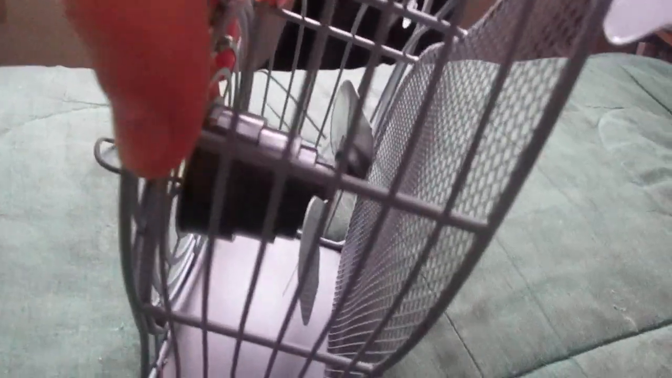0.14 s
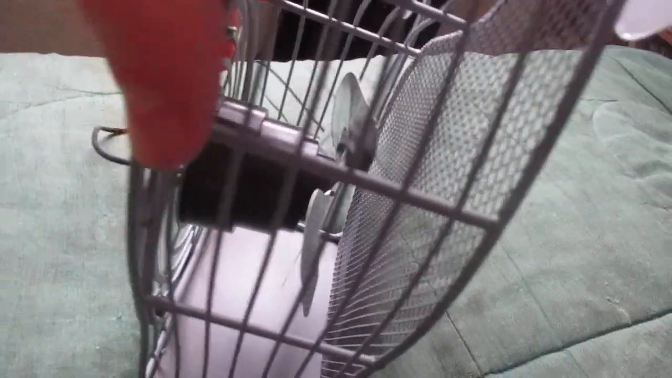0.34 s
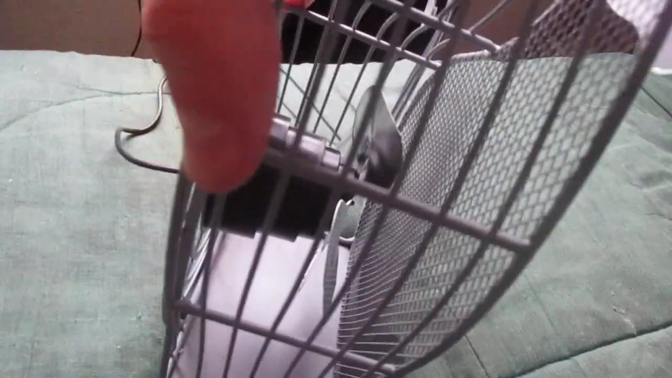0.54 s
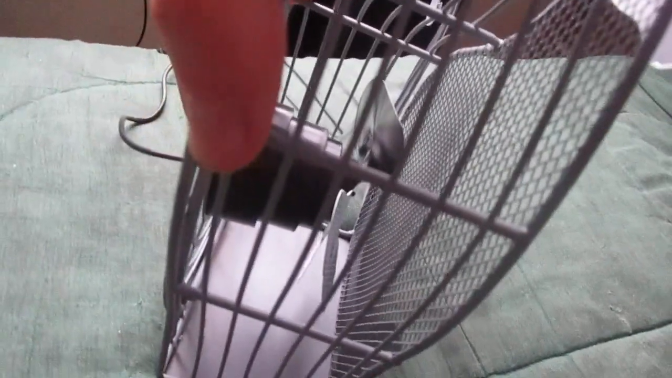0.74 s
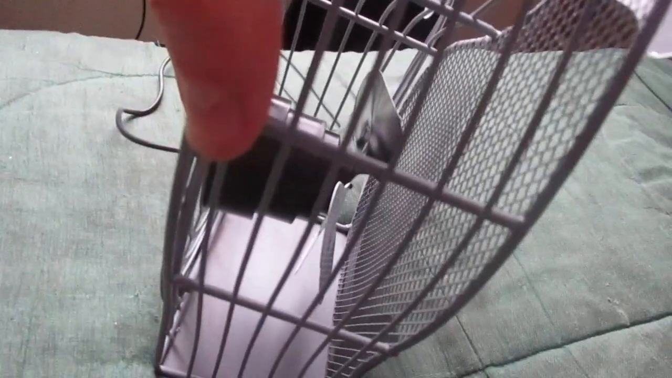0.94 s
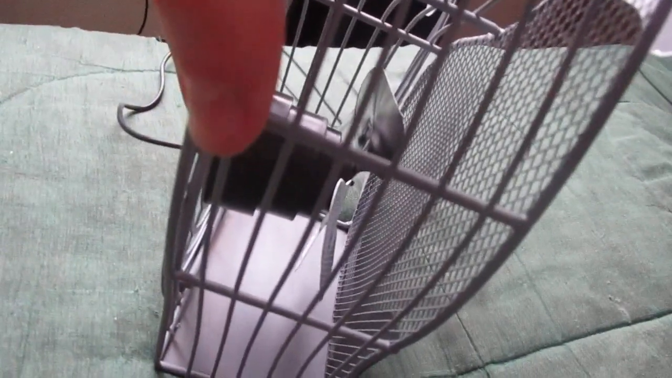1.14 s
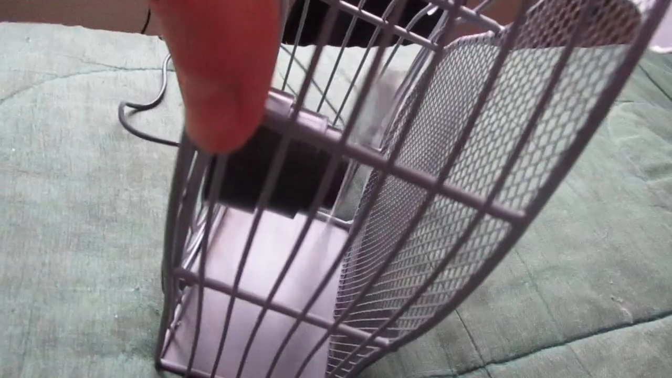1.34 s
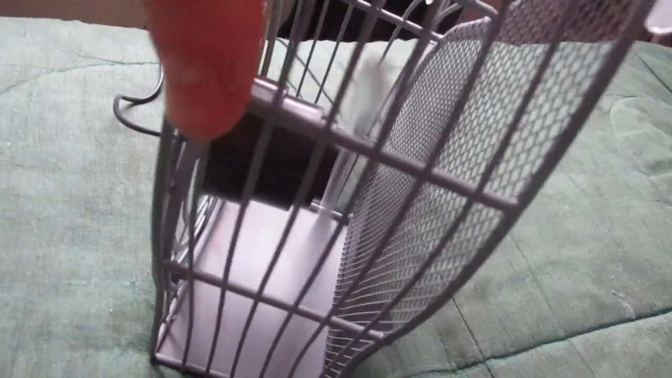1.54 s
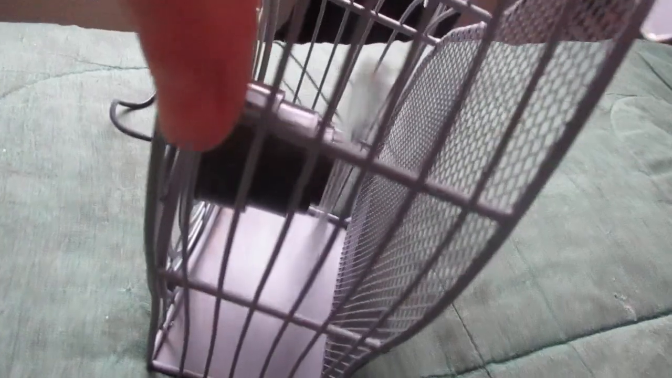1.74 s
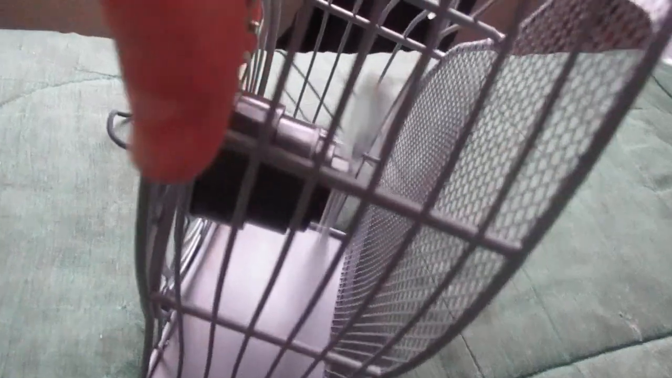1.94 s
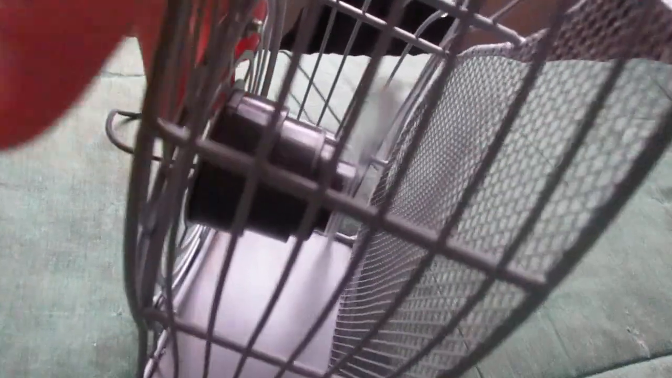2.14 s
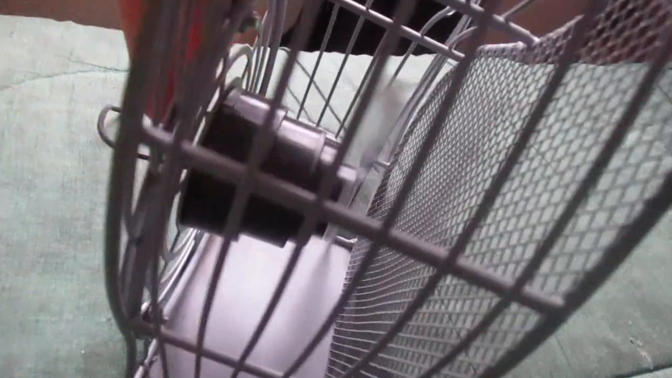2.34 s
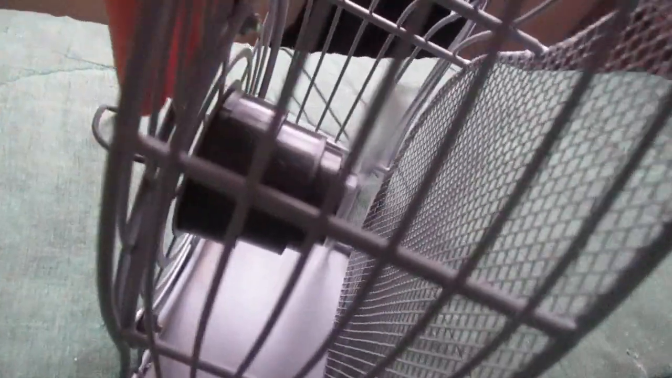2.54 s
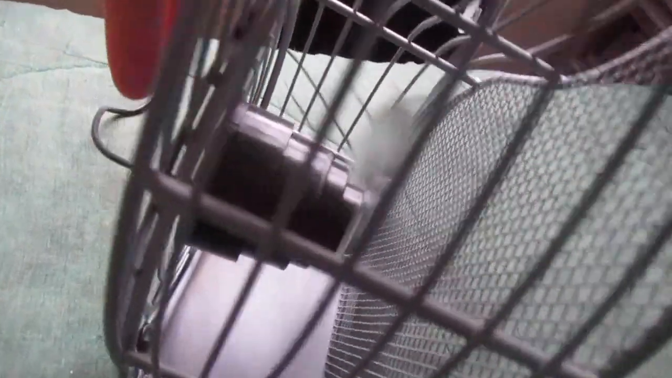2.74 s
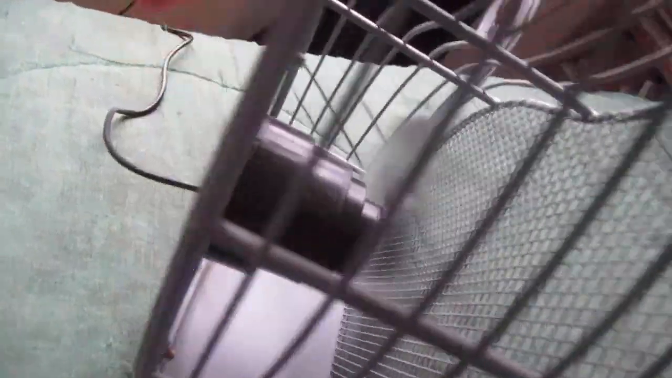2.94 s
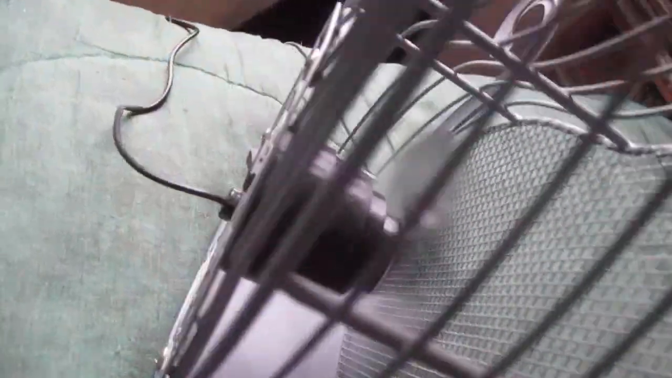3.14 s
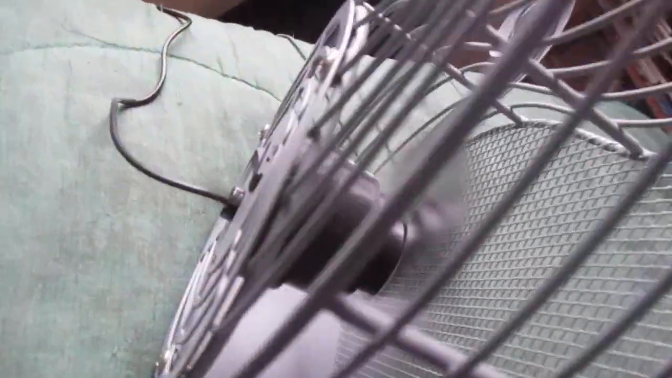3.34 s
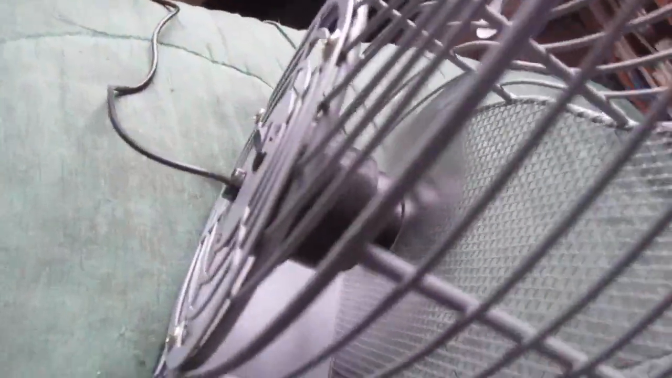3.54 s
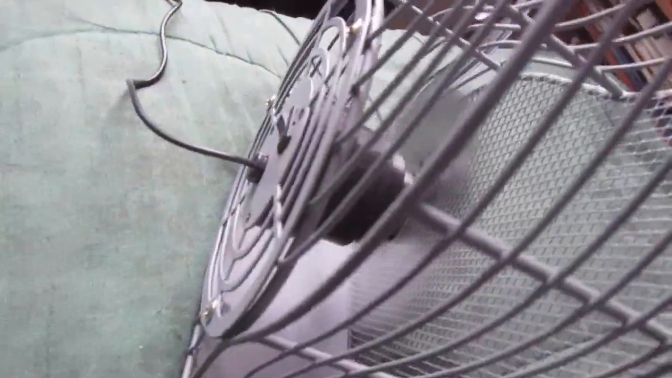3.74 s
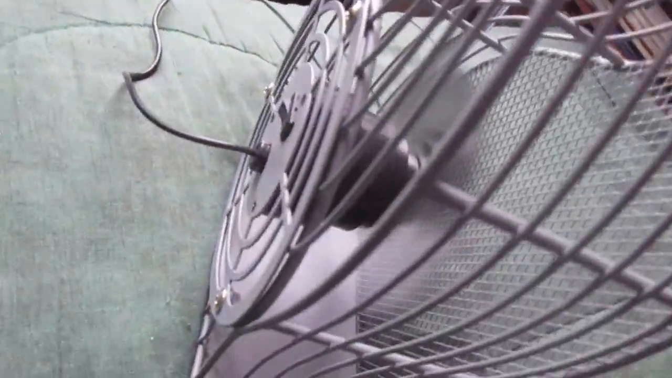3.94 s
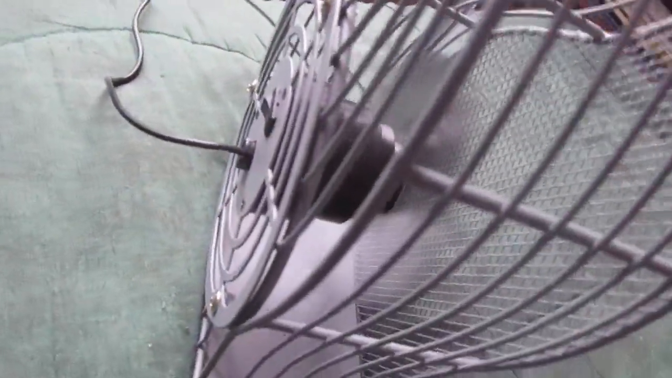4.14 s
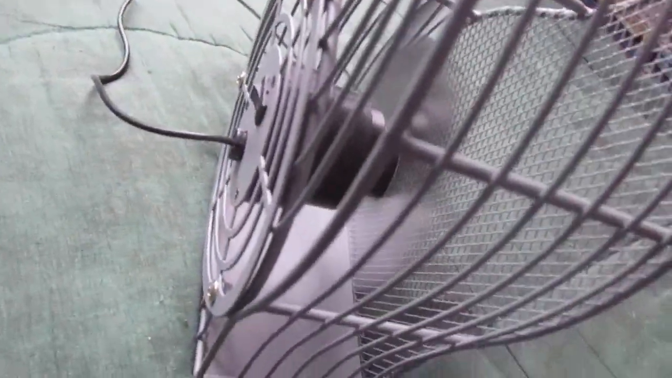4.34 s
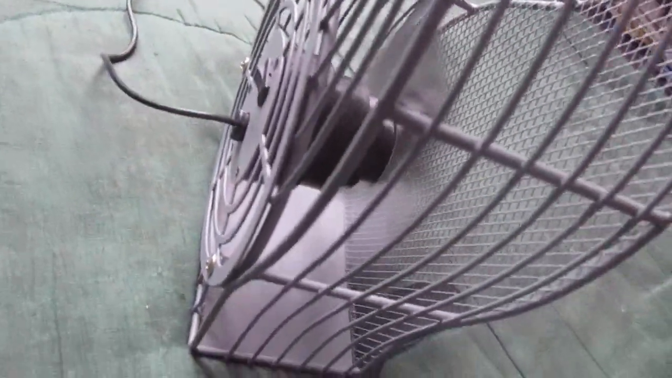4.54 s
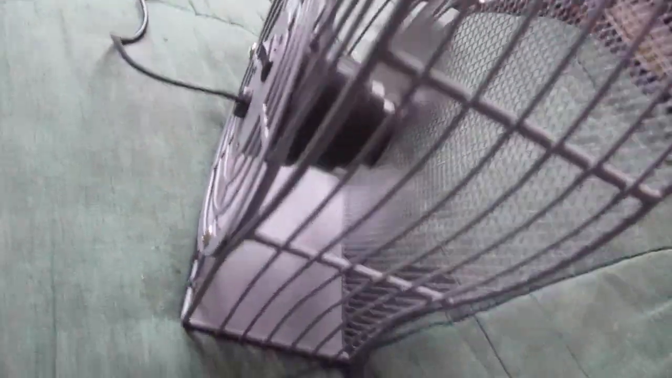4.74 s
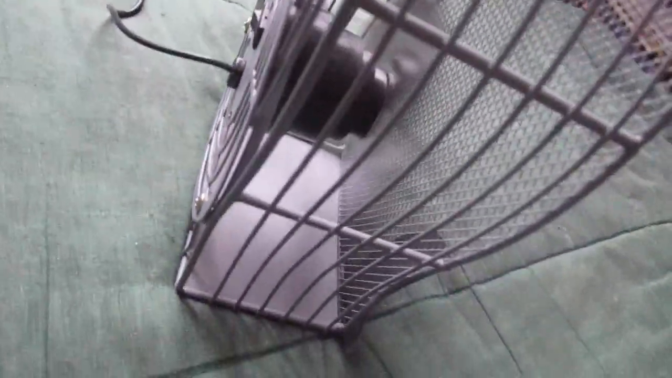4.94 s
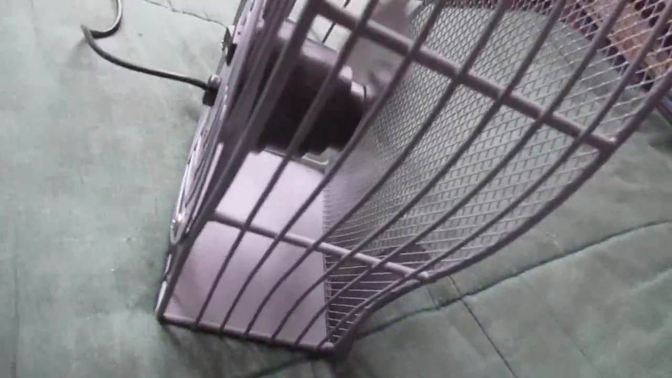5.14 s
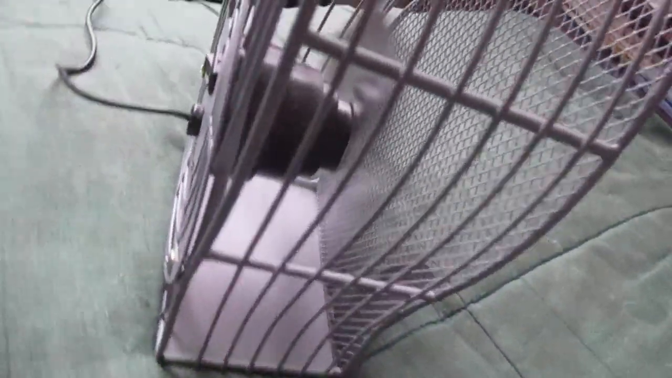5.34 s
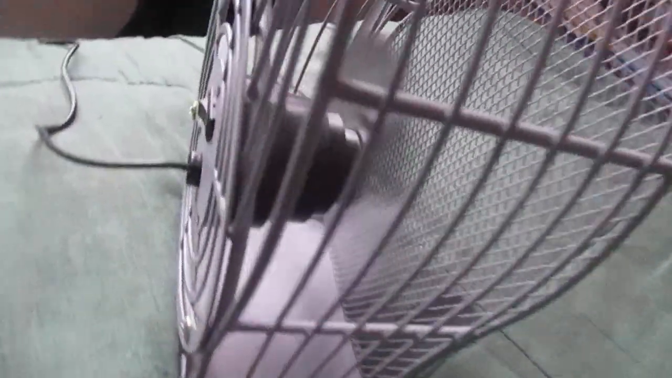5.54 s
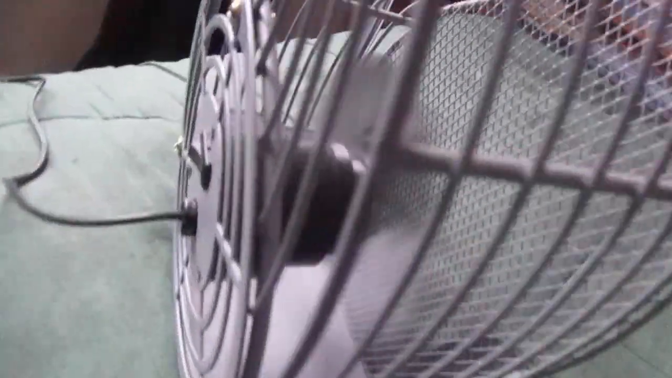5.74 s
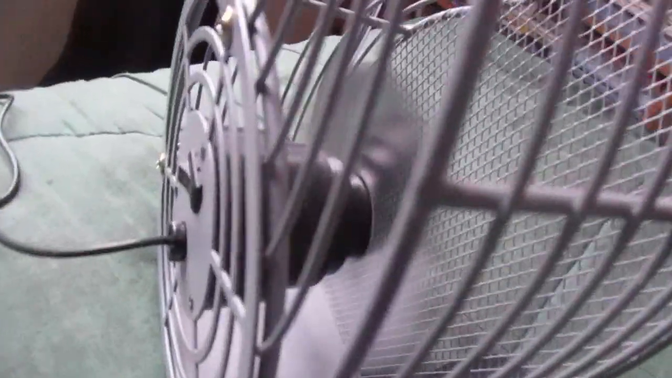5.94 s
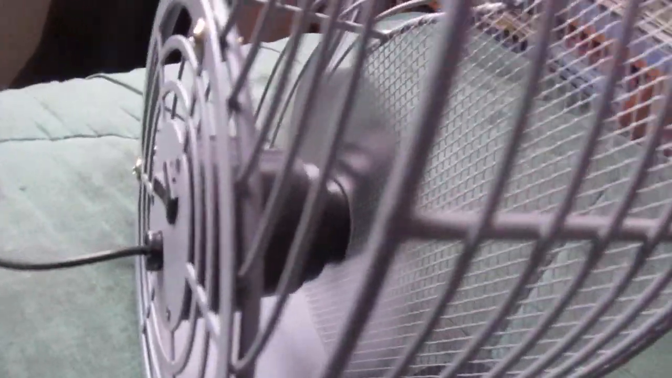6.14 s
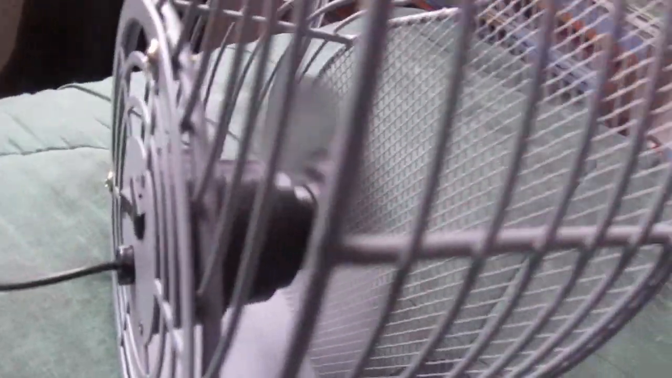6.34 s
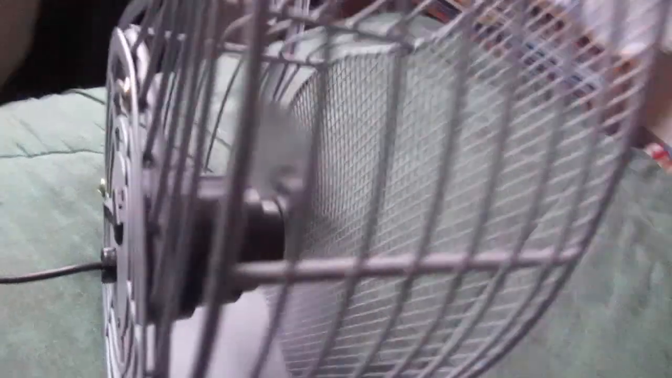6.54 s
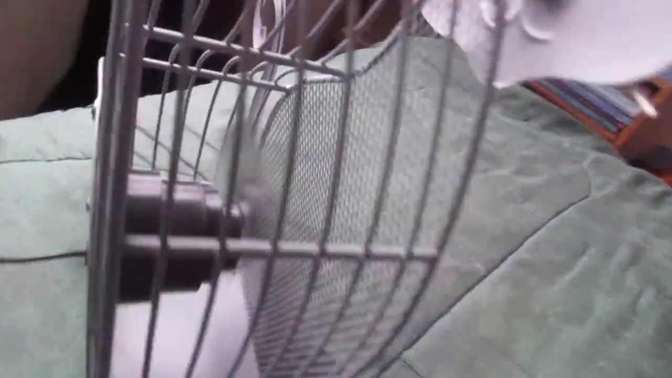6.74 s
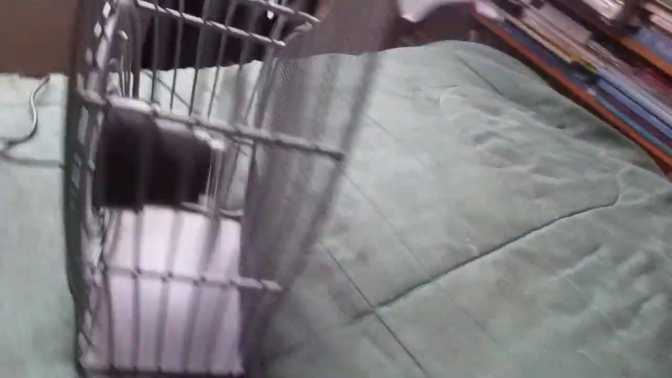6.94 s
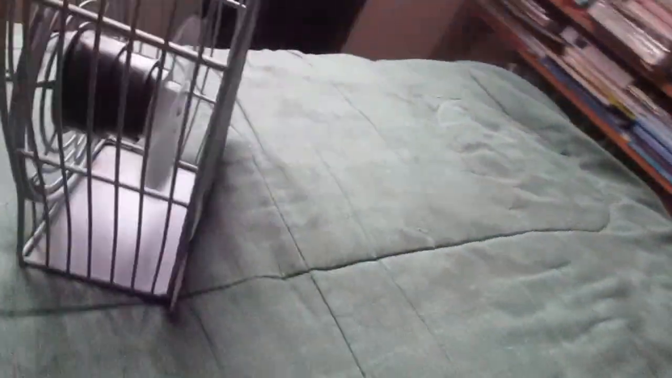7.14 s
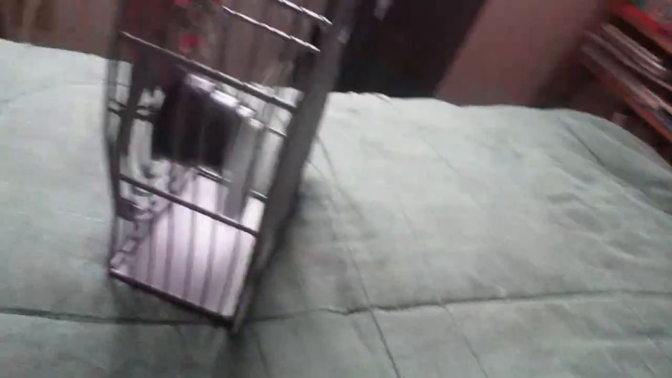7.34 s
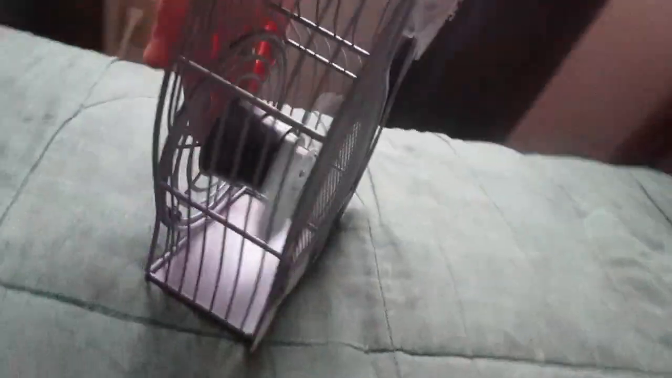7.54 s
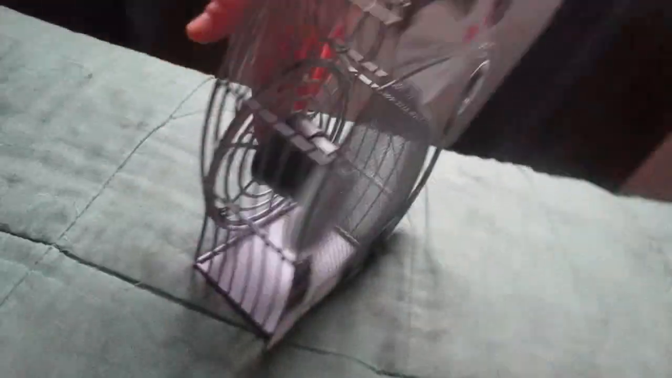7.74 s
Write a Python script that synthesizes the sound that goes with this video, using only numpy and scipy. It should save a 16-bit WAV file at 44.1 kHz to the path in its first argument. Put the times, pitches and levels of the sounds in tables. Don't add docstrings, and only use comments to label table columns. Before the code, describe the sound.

Close handheld pickup in a quiet room: faint rumble, a thin high whine and slight grip bumps. A hard switch click rings the metal cage, then a small motor spins up quickly into a low throbbing hum with hissy brush song and rushing air. Sharp plastic ticks and small creaks punctuate the steady run, which swells nearer and then recedes.

```python
import sys
import numpy as np
from scipy import signal
from scipy.fft import irfft
from scipy.io import wavfile
from scipy.ndimage import uniform_filter1d

SR = 44100
rng = np.random.default_rng(int(sys.argv[2]) if len(sys.argv) > 2 else 0)


def voltage_ratio(level):
    return 10 ** (np.asarray(level, float) / 20)


def digitize_waveform(pressure):
    field = np.atleast_2d(pressure).T
    bounded = np.clip(field, -1, 1)
    quanta = np.round(bounded * 32767).astype(np.int16)
    wavfile.write(sys.argv[1], SR, quanta)


N = 343539
T = np.arange(N) / SR
ON_S, TOP_HZ = 1.2, 56.64


def evened(x):
    return x / np.sqrt(np.mean(x ** 2) + 1e-20)


def read(points, hz):
    f, value = np.transpose(points)
    return np.interp(np.log(hz + 1), np.log(f + 1), value)


def add(mix, s, sound):
    part = mix[round(s * SR):][:len(sound)]
    part += sound[:len(part)]


def resonate(x, hz, width):
    r = np.exp(-np.pi * width / SR)
    return 2 * signal.lfilter([1 - r], [1, -r * np.exp(2j * np.pi * hz / SR)], x).real


def resonate_twice(x, hz, width):
    return resonate(resonate(x, hz, width), hz, width)


def drift(rate):
    swings = np.geomspace(rate / 20, rate, 12)
    return evened(sum(np.sin(2 * np.pi * (f * T + rng.random())) / np.sqrt(f) for f in swings))


def hiss(points, patchy_db, size=1024):
    hop = size // 4
    a, b, patches = rng.standard_normal((N // hop + 5, size // 2 + 1, 3)).T
    patches = evened(uniform_filter1d(uniform_filter1d(patches, 10, 0), 10, 1))
    colour_db = read(points, np.fft.rfftfreq(size, 1 / SR))[:, None]
    z = (a + 1j * b) * voltage_ratio(colour_db + patchy_db * patches)
    return evened(signal.istft(z, nperseg=size, noverlap=size - hop)[1][:N])


# t/s, nearness level/dB, facing the blades [0-1]
VIEW = [(1.3, -3, 0.3), (1.8, -4, 0.54), (2.3, -3, 0), (2.7, -0.3, 0.64), (3.1, 0, 0.75), (3.45, 1, 0.3),
        (3.8, 0.5, 0.88), (4.3, 1.1, 1), (4.8, 0.7, 0.98), (5.1, 0.5, 0.65), (5.5, 0, 0.53), (5.9, 3, 0.58),
        (6.35, 2.5, 0.48), (6.65, -2.5, .3), (6.9, -4, 0), (7.2, -8.5, 0.44), (7.5, -8, 0.6),
        (7.79, -9, .6)]


def heard(laws, speed):
    s, near_db, facing = np.transpose(VIEW)
    near_db, facing = np.interp(T, s, near_db), np.interp(T, s, facing)
    gains = []
    for db, power, share, facing_db in laws:
        place_db = db + share * near_db + facing_db * facing
        gains.append(voltage_ratio(place_db) * np.clip(speed, 0, 2) ** power)
    return gains


def passing(hz, centre_hz, width_hz, db):
    return 1 + voltage_ratio(db) / (1 + ((hz - centre_hz) / width_hz) ** 4)


# f/Hz, level/dB [per Hz]
ROOM = [(26, -13), (48, 6.5), (79, 0.5), (210, -4.5), (513, -13.5), (760, -21.5), (1000, -17.5),
        (2200, -18.5), (4300, -26), (4880, -38), (5350, -24.5), (8400, -23), (11000, -26.5), (16000, -38)]


def room():
    room_db, whine_db, whine_hz, frames_per_s = -54, -62.5, 7867.1, 29.97
    flips = np.tanh(12 * np.sin(np.pi * frames_per_s * T + .7))
    level = np.sqrt(2) * voltage_ratio(whine_db + .5 * drift(1.5))
    whine = level * flips * np.sin(2 * np.pi * whine_hz * T)
    return voltage_ratio(room_db) * hiss(ROOM, 1.8, size=2048) + whine


# t/s, peak level/dB, low ring f/Hz, high ring f/Hz, high over low level/dB
TICKS = [(0.4072, -38, 1790, 2900, -19), (2.543, -35.5, 3600, 6500, 3), (3.386, -35, 6400, 8800, 1.5),
         (3.743, -42, 3850, 6500, -6), (4.15, -38, 4260, 8900, -7), (4.3093, -10.5, 3970, 7900, -2),
         (4.31, -20, 5530, 13500, -3), (4.3153, -32, 4100, 9000, 1.5), (4.335, -29, 4000, 9500, -1.5),
         (4.344, -26, 4050, 9400, -5), (4.3544, -30, 4170, 9500, 1.5), (4.375, -33, 3800, 10200, -3),
         (4.3935, -38, 6400, 10500, -3), (4.404, -35, 4200, 6400, 3), (4.697, -19, 3600, 6040, 4),
         (4.6964, -17.5, 7800, 8300, -5), (4.8027, -33, 3000, 6000, 3), (5.0757, -11, 2270, 5660, -3.5),
         (5.0762, -22.5, 3600, 1240, -11), (5.5274, -24, 4200, 6140, 1), (5.922, -38, 5570, 8330, 0)]
# f/Hz, width f/Hz, level/dB
SHELL = [(9000, 1300, -12), (13500, 7100, -34)]


def ticks():
    crumble_ms, break_size = .68, 6
    out, t = np.zeros(N), T[:2000]
    for s, db, low_hz, high_hz, high_db in TICKS:
        fade = np.exp(-t * 1000 / crumble_ms) * (1 - np.exp(-t * 4000 / crumble_ms))
        kick = rng.standard_normal(len(t)) * fade
        kick = kick - break_size * (t == t[int(8 * crumble_ms)])
        tick = evened(resonate_twice(kick, low_hz, 1130))
        tick = tick + voltage_ratio(high_db) * evened(resonate_twice(kick, high_hz, 1700))
        tick = tick + sum(voltage_ratio(gain_db) * evened(resonate_twice(kick, hz, w)) for hz, w, gain_db in SHELL)
        add(out, s, voltage_ratio(db) * tick / abs(tick).max())
    return out


# start t/s, length t/s, level/dB, f/Hz, width f/Hz
CREAKS = [(3.964, 0.057, -48.5, 6850, 3470), (3.97, 0.023, -50.5, 3800, 1500),
          (4.315, 0.13, -54, 9500, 2500), (4.371, 0.082, -60, 6300, 2000), (4.165, .015, -57, 4300, 800),
          (4.321, 0.12, -53.5, 3700, 2000), (4.985, 0.14, -54, 8200, 2500), (6.5, 0.1, -58, 6300, 2020),
          (7.678, 0.1, -54, 8950, 4000), (7.702, 0.058, -97, 10050, 250), (7.703, 0.042, -61, 6300, 250),
          (7.737, 0.03, -63, 4400, 400)]


def creaks():
    slips_per_s, grit = 500, .2
    out = np.zeros(N)
    for s, length, db, hz, width in CREAKS:
        chance, size = rng.random((6000, 2)).T
        slips = (chance < slips_per_s / SR) * voltage_ratio(-2.5 * np.log(size + 0.0011)) + grit * (size - .5)
        swell = np.sin(np.pi * np.clip(T[:6000] / length, 0, 1)) ** 0.5
        creak = evened(resonate_twice(slips * swell, hz, width))
        add(out, s, voltage_ratio(db) * creak / np.std(creak[:int(length * SR)]))
    return out


# t/s, peak level/dB, f/Hz, length [cycles]
BUMPS = [(0.391, -46, 200, 1.9), (1.156, -44.5, 220, 2), (1.2, -40.5, 554, 3), (1.2, -43, 111, 1.2),
         (1.343, -38, 160, 0.8), (1.345, -40, 400, 1.1), (5.068, -29, 120, 1.2), (5.0757, -31, 300, 0.9),
         (5.25, -36, 100, 1.5), (6.889, -32.5, 136, 3.8), (7.449, -40, 150, 1.5), (7.46, -40, 420, 1.6),
         (7.72, -41, 200, 2.5)]


def bumps():
    out, t = np.zeros(N), T[:4000]
    for s, db, hz, cycles in BUMPS:
        u = t * hz / cycles
        add(out, s, voltage_ratio(db) * np.e * 3 * u * np.exp(-3 * u) * np.sin(2 * np.pi * hz * t))
    return out


def handling():
    return ticks() + creaks() + bumps()


# f/Hz, level/dB [per Hz]
SNAP = [(180, -55), (300, -51), (1200, -24), (3130, -4), (4020, -18), (4530, -17), (6130, 5.5), (7140, 4),
        (8740, -22), (10900, -22), (11800, -6.5), (13800, -13), (16900, -42)]
# f/Hz, level/dB, t60/s
CAGE = [(2358, -5, 0.27), (2627, -21, 0.43), (2665, -16, 0.35), (3494, -8, 0.19), (3747, -4, 0.15),
        (3817, 0, 0.13), (3951, -2, 0.13), (4016, -5, 0.17), (4264, -20, 0.25), (4452, -7, 0.17),
        (4780, -10, 0.17), (4990, -14, 0.16), (5351, -8, 0.12), (5459, -15, 0.17),
        (1525, -24, 0.66), (1730, -27, 0.78), (2665, -27, 0.9), (3815, -19, .4)]
# f/Hz, level/dB, t60/s
LEVER = [(6094, -27, .2), (6379, -18, .16), (7171, -17, .18), (7343, -14, .08), (7500, 2, .06),
         (7768, -22, .12), (8759, -22, .088), (9152, -28, .13), (9814, -23, .075), (10060, -30, .084),
         (10820, -35, .11), (11700, -34, .12), (12100, -20, .067), (12930, -30, .069)]
# f/Hz, level/dB [per Hz]
CAGE_TAIL = [(350, -38), (600, -13), (894, -33), (1050, -25), (1550, -8), (1960, -10), (2340, -4.5),
             (2830, -14), (3890, -1.5), (4750, -23), (5400, -4), (7410, -1.5), (12500, -8), (16000, -29)]
# f/Hz, t60/s
CAGE_T60 = [(600, 0.14), (1500, 0.12), (2500, 0.18), (4000, 0.22), (7000, .13), (12000, 0.085)]


def switch():
    snap_db, ring_db, lever_db, tail_db = 0, -29.5, 16, -26.5
    t, out = T[:SR // 2], np.zeros(N)
    log_gain = np.log(voltage_ratio(np.maximum(read(SNAP, abs(np.fft.fftfreq(2048, 1 / SR))), -60)))
    snap = np.fft.ifft(np.exp(log_gain - 1j * signal.hilbert(log_gain).imag)).real[:1024]
    add(out, 1.1997, voltage_ratio(snap_db) * snap / abs(snap).max())
    modes = CAGE + [(hz, db + lever_db, t60) for hz, db, t60 in LEVER]
    ring = sum(voltage_ratio(db - 60 * t / t60) * np.sin(2 * np.pi * hz * t + hz) for hz, db, t60 in modes)
    add(out, 1.1998, voltage_ratio(ring_db) * ring * (1 - np.exp(-t / 0.0028)))
    hz, s, z = signal.stft(rng.standard_normal(len(t)), SR, nperseg=256)
    tail_gain = voltage_ratio(read(CAGE_TAIL, hz)[:, None] - 60 * s / read(CAGE_T60, hz)[:, None])
    tail = signal.istft(z * tail_gain, SR, nperseg=256)[1][:len(t)]
    add(out, 1.2, voltage_ratio(tail_db) * tail / np.std(tail[:900]) * (1 - np.exp(-t / 0.00049)))
    return out


# t/s, loss f/Hz
SAG = [(2.2, 0), (2.7, .2), (3.45, .2), (3.95, .1), (4.5, .04), (4.9, 0), (6.2, 0), (6.7, .1), (7.79, .085)]


def shaft():
    spin_s, grip_s = .43, .09
    speed = 1 - np.exp(-np.maximum(T - ON_S - grip_s, 0) / spin_s)
    speed = speed - np.interp(T, *np.transpose(SAG)) / TOP_HZ
    speed = speed * (1 + .00008 * drift(3))
    return speed, 2 * np.pi * np.cumsum(TOP_HZ * speed) / SR


# order [per turn], level/dB
COGS = [(11, -5), (12, -2.5)]


def cogging(speed, angle):
    waver_db, slip_fade_db = 1.5, 40
    slip = np.clip(1 - speed, 0, 1)
    out = 0
    for k, db in COGS:
        level_db = db + waver_db * drift(9) - slip_fade_db * slip * (k < 12)
        out = out + voltage_ratio(level_db) * np.cos(k * angle + k * k)
    return out * passing(12 * TOP_HZ * speed, 610, 14, 7)


# order [per turn], level/dB
SLOTS = [(18, 12), (24, -8), (30, -1), (36, 0), (42, -1), (48, -1), (54, -4), (60, -6)]
# f/Hz, level/dB
CAN = [(300, -16), (540, -29), (610, 10), (690, -16), (800, -34), (1300, -13), (1680, 12), (2000, 7),
       (2360, 7), (2600, -30), (4000, -41)]


def slot_whine(speed, angle):
    waver_db = 2.6
    slip = np.clip(1 - speed, 0, 1)
    current = (.09 + 1.6 * speed ** 5 * slip / (slip + .05)) * (T > ON_S)
    slots = 0
    for k, db in SLOTS:
        level_db = db + read(CAN, k * TOP_HZ * speed) + waver_db * drift(6.9)
        slots = slots + voltage_ratio(level_db) * np.cos(k * angle + k)
    can_ring = evened(resonate_twice(rng.standard_normal(N), 2360, 17))
    return voltage_ratio(-67) * current * (slots + voltage_ratio(4.5) * can_ring * speed ** 3)


# order [per turn], level/dB
TRACK = [(90, -16), (110, -8), (140, -6), (160, -3), (190, -2), (205, -3), (232, -3), (243, -1), (250, 0),
         (256, -6), (272, -13), (330, -18)]
# f/Hz, width f/Hz, level/dB
HOUSING = [(9100, 500, 5), (10450, 200, 3), (10850, 350, 5), (11450, 200, 5), (12600, 700, 4),
           (13820, 250, 6), (14170, 250, 9)]


def brushes(speed, angle, low, high):
    squeal_hz, squeal_db, squeal_order = 11250, 10, 244
    pull_db, swell_db = 22, 3.5
    slip = np.clip(1 - speed, 0, 1)
    size = 8192
    order = np.arange(size // 2 + 1)
    chance = rng.standard_normal((3, len(order), 2)) @ [1, 1j]
    tracks = irfft(voltage_ratio(read(TRACK, order)) * (order > 80) * chance, axis=1)
    place = angle / (2 * np.pi) % 1 * size
    laps = [np.interp(place, np.arange(size + 1), np.append(w, w[0])) for w in tracks]
    turn = 1.2 * T + .3 * drift(1)
    song = laps[0] + 0.26 * (np.cos(turn) * laps[1] + np.sin(turn) * laps[2])
    song = song * voltage_ratio(0.64 * np.cos(3 * angle))
    song = song + sum(voltage_ratio(db + swell_db * drift(1.52)) * resonate(song, hz, w) for hz, w, db in HOUSING)
    squeal = passing(squeal_order * TOP_HZ * speed, squeal_hz, 830, squeal_db) - 3
    springs = squeal * resonate_twice(song, squeal_hz, 900)
    pull = voltage_ratio(pull_db) * slip * resonate(resonate(song, 10500, 2200), 10900, 2100)
    song = song + springs + pull
    below = signal.oaconvolve(song, signal.firwin(101, 12500, fs=SR), "same")
    lean = voltage_ratio(5.5 * np.cos(angle + .4) - 1.5)
    return voltage_ratio(2.0) * low * lean * evened(below) + high * np.sqrt(lean) * evened(song - below)


# level/dB at full speed, power of speed, share of nearness, facing level/dB
MOTOR = [
    (-59.5, 4.5, 0, 1.5),
    (-61, 3.5, 0.28, 6),
    (-60.5, 1.3, 0.5, 1),
]


def motor(speed, angle):
    cog, low, high = heard(MOTOR, speed)
    slip = np.clip(1 - speed, 0, 1)
    scrape = voltage_ratio(-63.5) * (T > ON_S) * np.sqrt(slip) * hiss(CAN, 3.0)
    cogs = voltage_ratio(-0.5) * cog * cogging(speed, angle)
    return cogs + slot_whine(speed, angle) + scrape + brushes(speed, angle, low, high)


# level/dB at full speed, power of speed, share of nearness, facing level/dB
BEAT_LAWS = [
    (-35, 3.5, 1.07, -2.8),
    (-53, 10, 0.74, 1),
    (-61.5, 8.8, 1.03, 1.6),
    (-61.5, 3.04, 0.39, 15),
    (-52.5, 7.1, 1.17, -0.5),
]
# order [per turn], level/dB
UPPER = [(5, -6.5), (6, -3), (7, -16.5), (8, -4.5), (9, -17), (10, -42.5)]


def blades(speed, angle):
    *first, upper = heard(BEAT_LAWS, speed)
    first[1] = first[1] * passing(2 * TOP_HZ * speed, 99, 3.8, 17.5)
    first[3] = first[3] * passing(2 * TOP_HZ * speed, 99, 3.8, 3.0)
    first[2] = first[2] * passing(3 * TOP_HZ * speed, 168.3, 2.6, 12)
    orders = list(enumerate(first, 1)) + [(k, upper * voltage_ratio(db)) for k, db in UPPER]
    skew, bass_lag, late_lag, wander = .9, .68, .6, .045
    beat = 0
    for k, gain in orders:
        waver = voltage_ratio(0.79 * np.sqrt(k) * drift(18))
        lag = skew + bass_lag / k + late_lag * max(k - 6, 0) + wander * k * drift(12)
        beat = beat + np.sqrt(2) * gain * waver * np.cos(k * angle - lag)
    return beat


# level/dB at full speed, power of speed, share of nearness, facing level/dB
AIR = [
    (-52.5, 3, 0.23, 0.76),
    (-52, 4.6, 0.32, 1.5),
]
# f/Hz, level/dB [per Hz]
RUSH = [(300, -20), (500, -4), (680, -7), (800, -15), (1000, -4), (2700, -5), (4200, -11), (4860, -27),
        (5350, -14), (6200, -13), (8500, -17), (9500, -31), (11500, -36), (14000, -42), (16000, -46)]
# f/Hz, level/dB [per Hz]
BUFFET = [(22, -1), (45, 0), (100, -5), (200, -2), (350, -3.5), (600, -13), (800, -29), (1500, -77)]


def air(speed, angle):
    rush, buffet = heard(AIR, speed)
    puff = voltage_ratio(1.9 * np.cos(angle + .4) + .8 * np.cos(2 * angle + .4))
    lumps = voltage_ratio(3 * np.cos(angle - .2) + 1.8 * drift(8))
    return rush * puff * hiss(RUSH, 1.3) + buffet * lumps * hiss(BUFFET, 0.4, size=2048)


def scene():
    speed, angle = shaft()
    camera = room() + handling()
    fan = switch() + motor(speed, angle) + blades(speed, angle) + air(speed, angle)
    return (camera + fan)[None]


def low_pass(x):
    return signal.sosfilt(signal.butter(12, 17020, fs=SR, output="sos"), x)


def record(dry):
    thin = signal.sosfilt(signal.butter(2, 26, "high", fs=SR, output="sos"), dry)
    band = signal.firwin(301, 15780, window=("kaiser", 3), fs=SR)
    narrow = signal.oaconvolve(thin, band[None], "same")
    return low_pass(np.clip(narrow, -.978, .978))


dry = scene()
out = record(dry)
digitize_waveform(out)
```